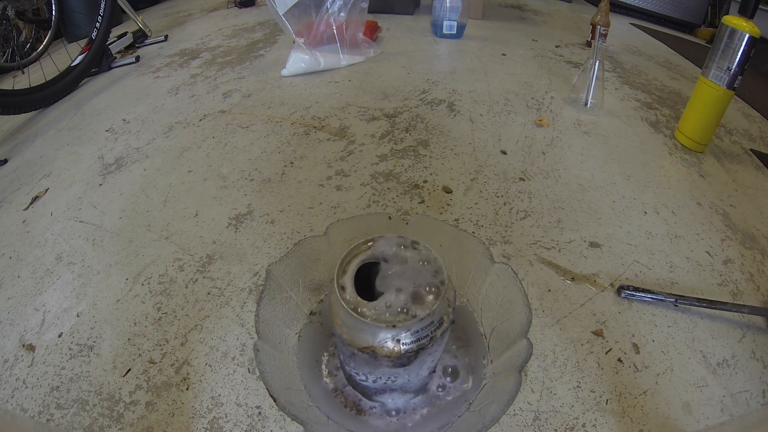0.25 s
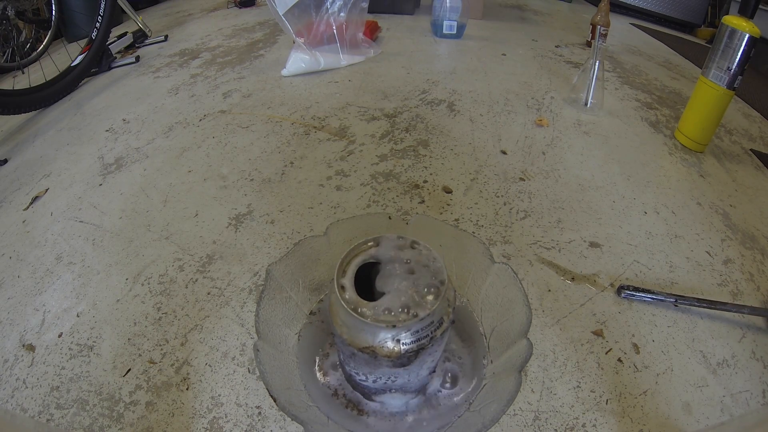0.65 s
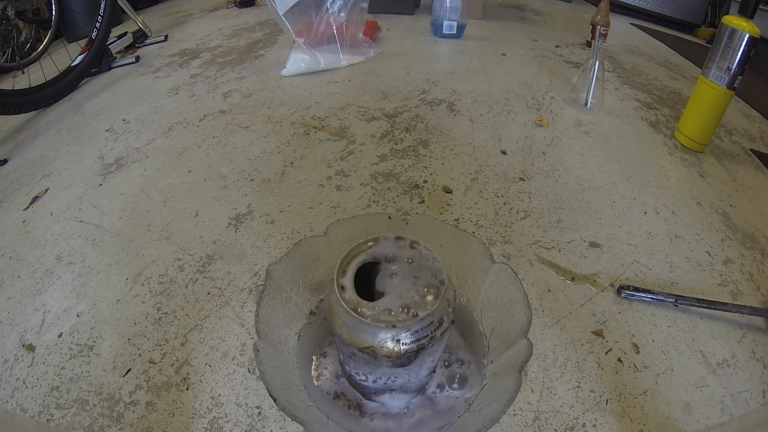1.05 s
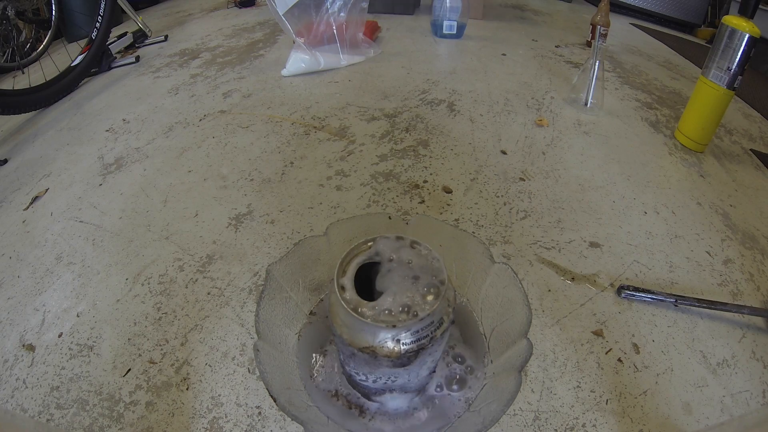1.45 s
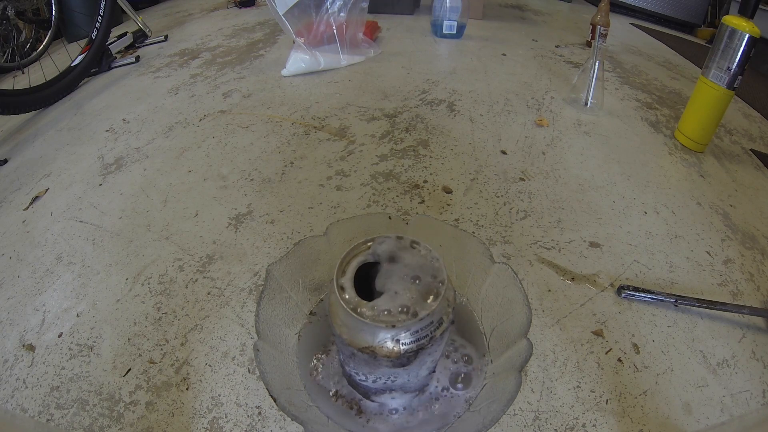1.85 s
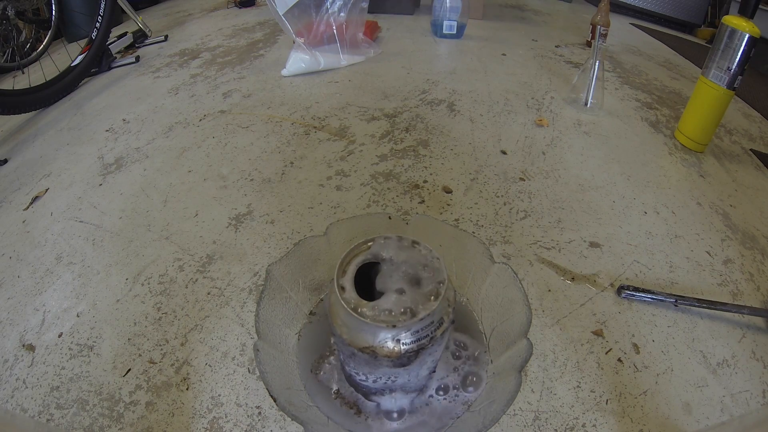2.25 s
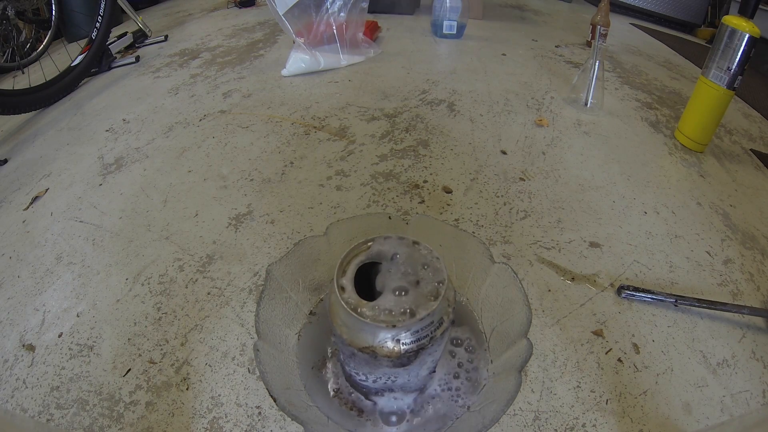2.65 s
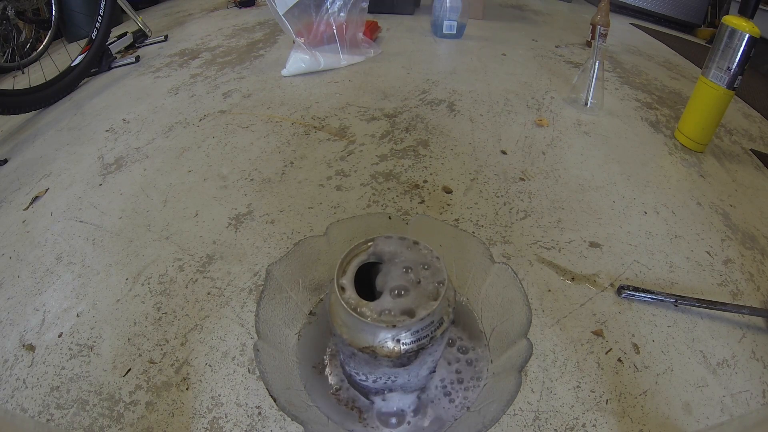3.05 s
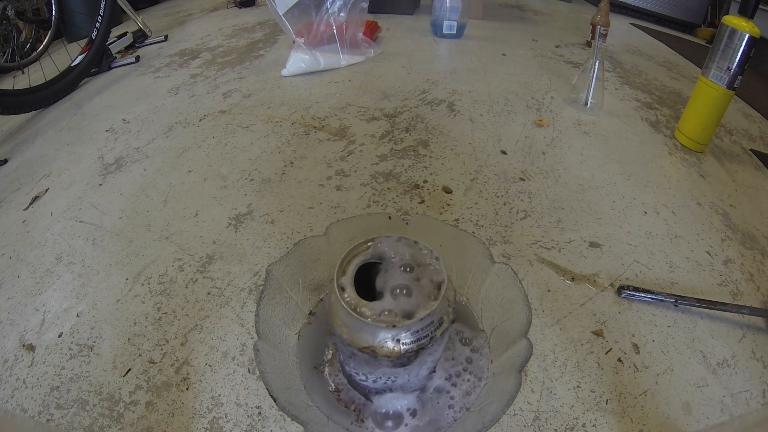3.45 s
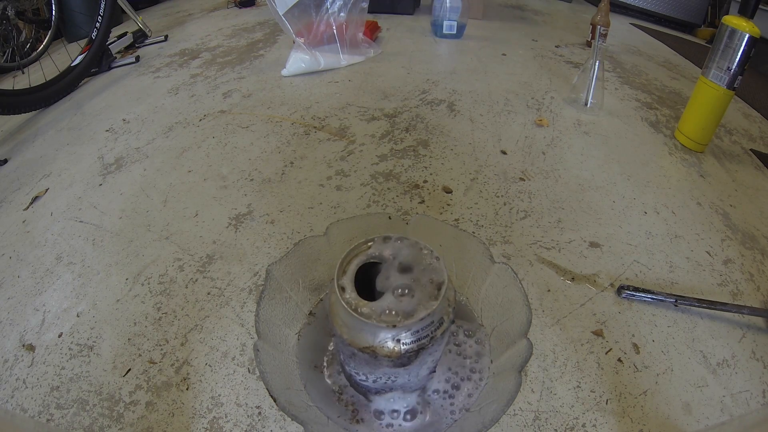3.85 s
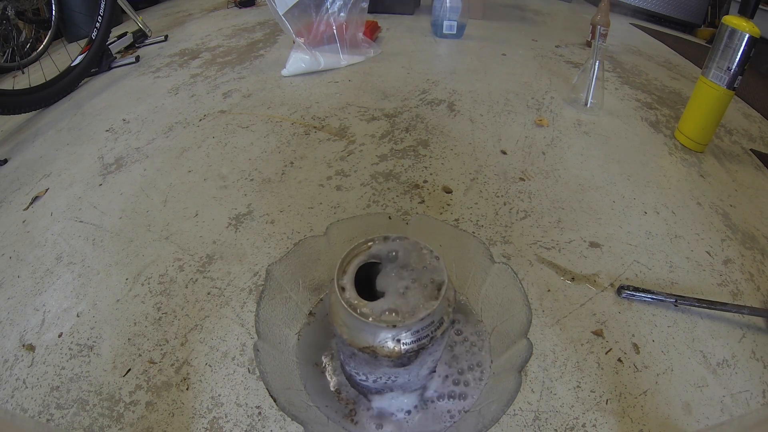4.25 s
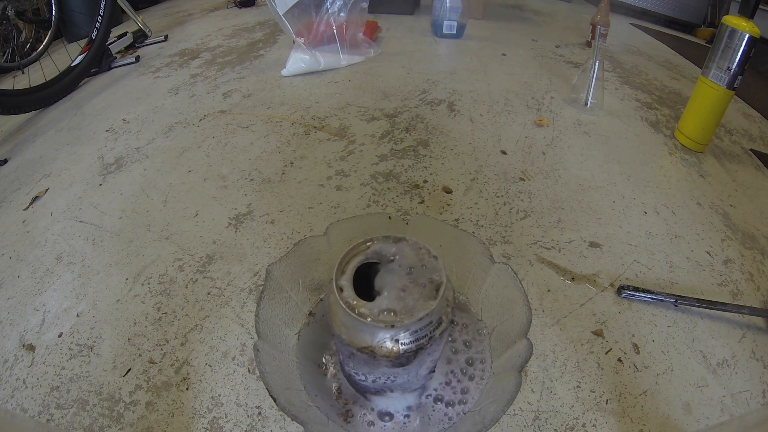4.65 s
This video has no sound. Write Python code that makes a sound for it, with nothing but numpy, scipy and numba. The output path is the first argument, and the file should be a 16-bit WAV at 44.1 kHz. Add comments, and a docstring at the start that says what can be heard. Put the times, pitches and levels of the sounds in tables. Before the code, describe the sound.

A close, mono view of a metal can dissolving in a glass bowl of liquid on a workshop surface. From start to finish, countless tiny bubbles burst so densely that they blend into an even, crisp hiss, with bright glassy resonances and a hollow, airy ring in the midrange from inside the can. The fizz barely changes in strength. Larger foam bubbles pop briefly: a higher blip at about 0.6 s, a low plop and a higher one close together near 1.7 s, a fainter one at 1.8 s, and a soft double pop around 2.6 s, each a dull wet snap with a quick rising tone and short tail. Underneath lie low rumble, steady room air, a wavering hum and a very faint high whine. A deep machine throb swells around 0.6, 2.3, 3.0 (strongest) and 3.7 s; then the fizz simply continues.

```python
"""On a workshop bench, heard close up, a metal can dissolves in a glass bowl of liquid.
Thousands of tiny gas bubbles, each a short decaying sine, burst every second and merge into a hiss.
The bowl's resonances lift parts of that hiss, and bursts inside the hollow can ring its air modes.
A machine throbs and hums in sine tones, with a thin whine, over low rumble and room air of filtered noise.
A few larger foam bubbles pop: a dull noise snap, a cavity tone gliding upward and a short noise tail."""
import sys
import numpy as np
from scipy import signal
from scipy.fft import rfft, irfft
from scipy.io import wavfile
from scipy.ndimage import uniform_filter1d
from numba import njit

SR = 44100
rng = np.random.default_rng(int(sys.argv[2]) if len(sys.argv) > 2 else 0)


def inscribe(sig):
    """Save sig as 16-bit PCM at rate SR to the path in sys.argv[1].

    A 1-D sig is mono; a 2-D sig holds one channel per row.
    Samples are clipped to [-1, 1] before scaling.
    """
    pcm = np.round(np.clip(np.atleast_2d(sig).T, -1, 1) * 32767)
    wavfile.write(sys.argv[1], SR, pcm.astype(np.int16))


N = 211724
TIME = np.arange(N) / SR  # s
BINS = np.arange(N // 2 + 1) * SR / N  # Hz

# broad colour of the fizz: f/Hz, relative level/dB
FIZZ_COLOUR = [(250, 1), (550, 7), (1000, 6), (2100, 2.5), (3300, 4), (4300, -1), (5800, 0.5), (8300, 1.5),
               (9400, -0.5), (11000, 0), (11900, -4.5), (13100, -7.5), (14200, -7), (15500, -24.5)]
# resonances of can and bowl that lift the fizz: f/Hz, full width at half the dB lift/Hz, lift/dB
BOWL_RESONANCES = [(2386, 340, 4), (3490, 190, 3), (3780, 280, 5.5), (5070, 280, 8.5), (6440, 380, 3),
                   (7480, 350, 2.5), (10070, 450, 2.5), (10820, 450, 3.5), (11300, 110, 8), (12800, 500, 6)]
# air modes of the hollow can: f/Hz, width of each resonator pass/Hz, relative gain/dB
CAN_AIR_MODES = [(1281, 127, -5), (1412, 140, -1), (1543, 168, -6), (1663, 59, -8.5), (1769, 336, -11.5)]
# low workshop rumble: f/Hz, relative level per Hz/dB
RUMBLE_COLOUR = [(5, -14), (22, -5.5), (40, 0.5), (65, -0.5), (100, -9), (135, -11.5), (200, -23),
                 (400, -43.5)]
# steady air noise of the room: f/Hz, relative level per Hz/dB
ROOM_COLOUR = [(40, -10.5), (130, -0.5), (190, -1.5), (290, -5), (380, -8.5), (520, -12), (750, -15.5),
               (1500, -26), (4000, -50)]
# swells of the machine's throb: t of the crest/s, full width at half the dB lift/s, lift/dB
THROB_SWELLS = [(0.62, 0.25, 9), (2.25, 0.47, 4.5), (2.983, 0.27, 13), (3.74, 0.25, 7)]
# machine hum: f/Hz, resting rms level/dB, rms waver/dB
HUM_TONES = [(60.05, -55.5, 1), (200.5, -59, 2), (267.9, -55.5, 2), (332.2, -67.5, 1.5)]
# faint steady whine: f/Hz, rms level/dB
WHINE_TONES = [(6533, -80), (6594, -78), (9890, -82), (10429, -81), (12646, -83)]
# larger bubbles popping: t/s, starting level of the cavity ring/dB, starting f/Hz,
# ring time to fall 60 dB/s, film snap level relative to the ring/dB
FOAM_POPS = [(.593, -35, 1420, 0.033, -14), (1.652, -33, 454, 0.036, -8), (1.680, -31.5, 1310, 0.023, -19),
             (1.818, -41, 600, 0.017, -4), (2.559, -40, 615, 0.021, -11), (2.581, -38.5, 573, 0.032, -6.5)]

# rms level of fizz and ringing can, and how far the shared vigour moves each
FIZZ_DB, FIZZ_WANDER_DB = -48.5, 0.1
CAN_DB, CAN_WANDER_DB = -48.5, 0.13
VIGOUR_STEPS_PER_S = 3.92
# the rumble stays level and surges a little at random
RUMBLE_DB, RUMBLE_SURGE_DB, RUMBLE_STEPS_PER_S = -42.5, 0.9, 6.01
ROOM_AIR_DB = -49.0
# deep throb of the machine: pitch, resting level and random waver
THROB_HZ, THROB_DB, THROB_WAVER_DB, THROB_STEPS_PER_S = 28.9, -50, 2.5, 5.07
TOP_HZ = 15400  # upper edge of the sound


def undb(db):
    """Decibels to gain."""
    return 10 ** (np.asarray(db) / 20)


def unit(x):
    """Scale to rms 1."""
    return x / np.sqrt(np.mean(x ** 2))


def slope(points):
    """Join (f/Hz, level/dB) points by straight lines on a log-frequency axis."""
    hz, db = np.transpose(points)
    return np.interp(np.log(BINS + 1), np.log(hz), db)


def colour(x, db):
    """Filter by a gain in dB for each frequency bin."""
    return irfft(rfft(x) * undb(db), N)


def coloured_noise(points):
    """White noise shaped to a colour curve, at rms 1."""
    return unit(colour(rng.standard_normal(N), slope(points)))


def resonate(x, hz, width_hz):
    """Two-pole resonance, gain 1 at the centre."""
    b, a = signal.iirpeak(hz, hz / width_hz, fs=SR)
    return signal.lfilter(b, a, x)


def walk(rate):
    """Random control curve of rms 1: levels held for 1 / rate s, then smoothed twice."""
    hold = max(int(SR / rate), 1)
    steps = np.repeat(rng.standard_normal(N // hold + 1), hold)
    smooth = uniform_filter1d(uniform_filter1d(steps, hold), hold)
    return unit(smooth[:N])


@njit
def ring(start, hz, cycles, size):
    """Each bubble is a sine that dies by 60 dB within its number of cycles; size sets its energy."""
    out = np.zeros(N)
    for k in range(len(start)):
        length = cycles[k] * SR / hz[k]
        # one complex multiply per sample turns the phase and shrinks the amplitude
        pole = np.exp(2j * np.pi * hz[k] / SR - np.log(1000) / length)
        z = size[k] / np.sqrt(length) + 0j  # equal energy for long and short rings of one size
        for i in range(start[k], min(N, start[k] + int(length))):
            out[i] += z.imag
            z *= pole
    return out


def bubbles(per_s, low_hz, high_hz, cycles, spread_db):
    """A swarm bursting at random times and pitches, most bubbles faint and a few strong, at rms 1."""
    when, pitch, damping, strength = rng.random((int(per_s * N / SR), 4)).T
    start = (when * N).astype(np.int64)
    hz = low_hz + (high_hz - low_hz) * pitch
    size = undb(-spread_db * np.log(1 - strength * .995))  # .995 caps the strongest
    return unit(ring(start, hz, cycles * (.5 + damping), size))


def fizz(vigour):
    """Fine foam bursts all over the metal; the can and bowl lift some pitches."""
    swarm = bubbles(per_s=48000, low_hz=300, high_hz=17000, cycles=16, spread_db=1.8)
    lift_db = sum(db * .5 ** ((2 * (BINS - hz) / width) ** 2) for hz, width, db in BOWL_RESONANCES)
    hiss = unit(colour(swarm, slope(FIZZ_COLOUR) + lift_db))
    return hiss * undb(FIZZ_DB + FIZZ_WANDER_DB * vigour)


def hollow_can(vigour):
    """Bursts inside the can keep its air modes ringing, each mode a doubled resonance."""
    ringing = np.zeros(N)
    for hz, width, db in CAN_AIR_MODES:
        swarm = bubbles(per_s=5000, low_hz=900, high_hz=2400, cycles=5, spread_db=1.5)
        mode = resonate(resonate(swarm, hz, width), hz, width)
        ringing += undb(db) * mode
    return unit(ringing) * undb(CAN_DB + CAN_WANDER_DB * vigour)


def rumble():
    """Low noise whose level surges slightly at random."""
    level_db = RUMBLE_DB + RUMBLE_SURGE_DB * walk(RUMBLE_STEPS_PER_S)
    return coloured_noise(RUMBLE_COLOUR) * undb(level_db)


def room_air():
    """Steady noise that falls away toward the treble."""
    return coloured_noise(ROOM_COLOUR) * undb(ROOM_AIR_DB)


def tone(hz, drift):
    """A sine of rms 1 whose phase wanders by drift (rms radians)."""
    turns = hz * TIME + rng.random()
    return np.sqrt(2) * np.sin(2 * np.pi * turns + drift * walk(rate=2.92))


def throb():
    """A deep machine tone that wavers, and now and then swells and sinks back in a bell shape."""
    swell_db = sum(db * .5 ** ((2 * (TIME - s) / length) ** 2) for s, length, db in THROB_SWELLS)
    level_db = THROB_DB + swell_db + THROB_WAVER_DB * walk(THROB_STEPS_PER_S)
    return tone(THROB_HZ, drift=0.54) * undb(level_db)


def hum():
    """Machine tones, each with its own random waver in level."""
    out = np.zeros(N)
    for hz, db, waver_db in HUM_TONES:
        out += tone(hz, drift=0.58) * undb(db + waver_db * walk(rate=8))
    return out


def whine():
    """Thin high tones at constant level, with drifting phase."""
    return sum(tone(hz, drift=0.62) * undb(db) for hz, db in WHINE_TONES)


def pops(rise, snap_hz, snap_t60, tail_db, tail_t60):
    """A wet film snaps dully, the opening cavity rings upward in pitch, and the bench scatters a tail."""
    out = np.zeros(N)
    t = TIME[:SR // 5]
    b, a = signal.butter(2, snap_hz, fs=SR)  # low-pass that dulls the snap
    for s, db, hz, t60, snap_db in FOAM_POPS:
        opening = np.minimum(t / t60, 1)
        phase = 2 * np.pi * np.cumsum(hz * (1 + rise * opening)) / SR
        cavity = np.sin(phase) * np.exp(-np.log(1000) * t / t60)
        dull_noise = unit(signal.lfilter(b, a, rng.standard_normal(len(t))))
        snap = dull_noise * np.exp(-np.log(1000) * t / snap_t60)
        pop = undb(db) * (cavity + undb(snap_db) * snap)
        start = int(s * SR)
        out[start:start + len(t)] += pop[:N - start]
    tail = rng.standard_normal(len(t)) * np.exp(-np.log(1000) * t / tail_t60)
    tail /= np.linalg.norm(tail)  # unit energy
    return out + undb(tail_db) * signal.fftconvolve(out, tail)[:N]


def scene():
    """Foam, can and workshop in mono; the vigour of the reaction moves fizz and can together."""
    vigour = walk(VIGOUR_STEPS_PER_S)
    foam = fizz(vigour) + hollow_can(vigour)
    workshop = rumble() + room_air() + throb() + hum() + whine()
    foam += pops(rise=0.18, snap_hz=1500, snap_t60=0.052, tail_db=-8, tail_t60=.15)
    return (foam + workshop)[None]


def record(dry):
    """A steep elliptic low-pass (0.2 dB ripple, 80 dB stopband) cuts the top."""
    top_cut = signal.ellip(10, .2, 80, TOP_HZ, fs=SR, output="sos")
    return signal.sosfilt(top_cut, dry)


dry = scene()
out = record(dry)
inscribe(out)
```